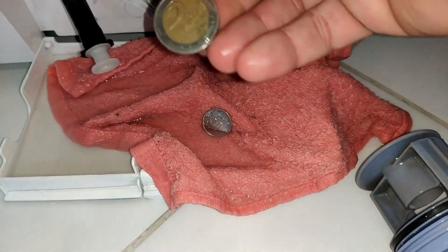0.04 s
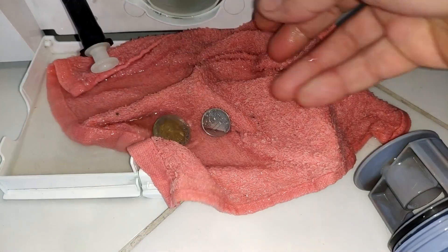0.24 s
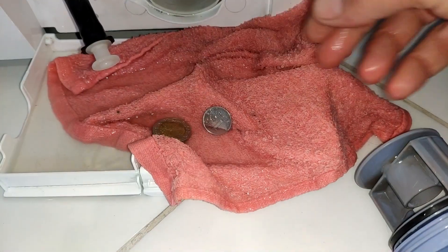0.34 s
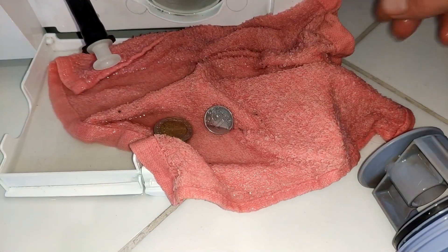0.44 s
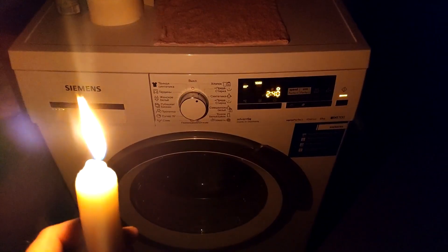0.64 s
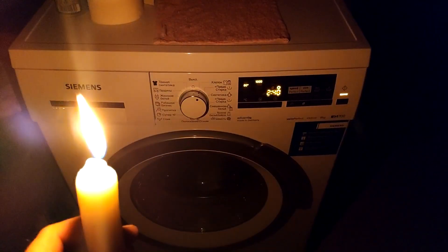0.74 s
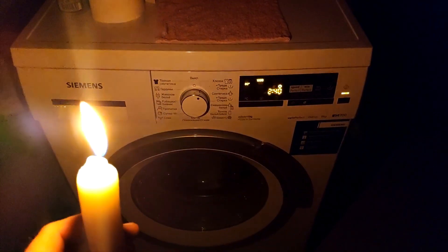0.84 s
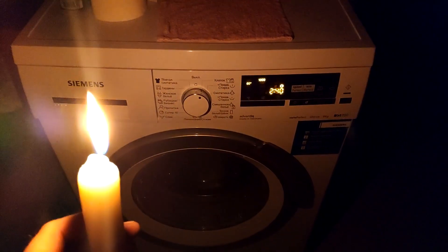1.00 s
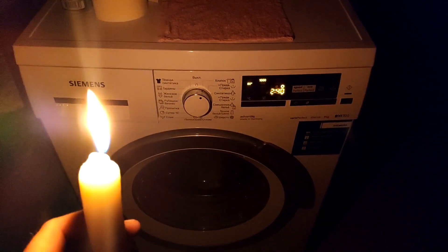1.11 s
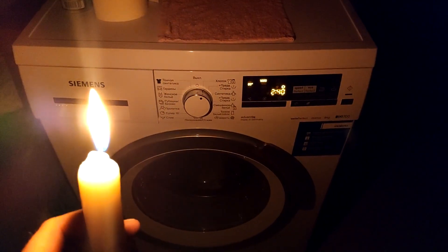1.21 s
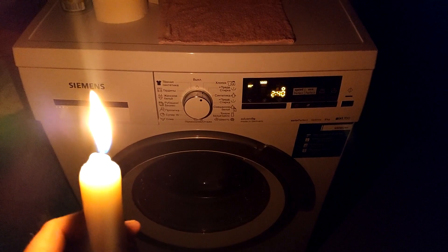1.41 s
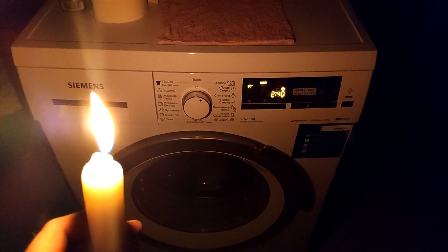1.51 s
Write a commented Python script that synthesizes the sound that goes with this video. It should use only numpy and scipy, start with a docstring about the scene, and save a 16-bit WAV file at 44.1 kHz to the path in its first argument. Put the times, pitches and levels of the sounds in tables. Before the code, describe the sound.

A coin drops onto a cloth on a tiled floor, giving one sharp, hollow knock with no metallic ring. The small room reverberates briefly around the close microphone, then the echo cuts off, leaving a very faint low hum.

```python
"""A coin drops onto a cloth on a tiled floor and gives one hollow knock, with no metal ring.
The impact excites the damped modes of a plastic housing beside it, and a near wall reflects the bass.
The small room reverberates with a diffuse tail and a few standing waves. A tiny tick comes first, as
the coin leaves the fingers. The tail stops abruptly where the faint background hum gives way to a
second, equally quiet one."""
import sys
import numpy as np
from scipy import signal
from scipy.fft import rfft, irfft
from scipy.io import wavfile

SR = 44100
rng = np.random.default_rng(int(sys.argv[2]) if len(sys.argv) > 2 else 0)


def generate_wav(signal):
    """Clip the signal to [-1, 1] and save it as 16-bit WAV at the path in sys.argv[1]."""
    frames = np.transpose(np.atleast_2d(signal))
    scaled = np.clip(frames, -1, 1) * 32767
    pcm = np.round(scaled).astype(np.int16)
    wavfile.write(sys.argv[1], SR, pcm)


N = 68355
KNOCK_S = 0.2375

# Left-right coherence of the coin's sounds, clipped to +-1 in use: frequency_hz, correlation
COHERENCE = [(100, 1.16), (350, 0.7), (700, 1.08), (1300, -0.42), (3000, 0.12), (14000, -1)]
# Stereo balance of the direct sound: frequency_hz, left_minus_right_db
DIRECT_BALANCE = [(150, -6), (600, 1.5), (3000, -9), (5500, 4.5), (7500, -10), (10000, -24.5), (14000, -19)]
# Stereo balance of the reflected sound: frequency_hz, left_minus_right_db
ROOM_BALANCE = [(150, -2.5), (330, -6), (1100, -5), (2000, -2), (5000, -1), (7500, -5), (10000, -25.5),
                (14000, -18.5)]


def amp(db):
    """Amplitude ratio of a level in decibels."""
    return 10 ** (np.asarray(db) / 20)


def unit_rms(x):
    """Normalisation to an rms of 1."""
    return x / np.sqrt(np.mean(x ** 2) + 1e-20)


def curve_at(points, hz):
    """Interpolation on a log-frequency axis."""
    knots_hz, values = np.transpose(points)
    return np.interp(np.log(hz + 1), np.log(knots_hz + 1), values)


def since(start_s):
    """Seconds elapsed since start_s, zero before it."""
    return np.maximum(np.arange(N) / SR - start_s, 0)


def burst(start_s, rise_s, t60_s):
    """Exponential decay, 60 dB in t60_s, with a linear onset."""
    t = since(start_s)
    return np.minimum(t / rise_s, 1) * np.exp(-np.log(1000) * t / t60_s)


def noise(spectrum, coherence, balance):
    """Partial coherence: two channels share part of a coloured noise; the overall rms is 1."""
    hz = np.fft.rfftfreq(N, 1 / SR)
    common, separate = rfft(rng.standard_normal((2, N)))
    correlation = np.clip(curve_at(coherence, hz), -1, 1)
    left = (correlation * common + np.sqrt(1 - correlation ** 2) * separate) * amp(curve_at(balance, hz))
    return unit_rms(irfft(np.array([left, common]) * amp(curve_at(spectrum, hz)), N))


def tone(hz, wander_hz):
    """Slow random frequency modulation makes a sine of rms 1 waver."""
    below_8_hz = np.fft.rfftfreq(N, 1 / SR) < 8
    drift = unit_rms(irfft(rfft(rng.standard_normal(N)) * below_8_hz, N))
    cycles = np.cumsum(hz + wander_hz * drift) / SR + rng.random()
    return np.sqrt(2) * np.sin(2 * np.pi * cycles)


def hollow_knock():
    """Modal ringing: the coin's rim excites the housing's low modes, then its face the high ones."""
    # Modes of the hollow housing: pitch_hz, left_db, right_db, t60_s
    modes = [(145.5, -22.5, -17.5, 0.13), (318.9, -21, -14.5, .11), (430, -21, -21.5, 0.09),
             (643, -23.5, -21.5, 0.12), (800, -18, -17.5, 0.034), (958, -15.5, -21.5, 0.12),
             (1013, -17.5, -27, 0.029), (1241, -24, -10, 0.067), (1704, -14.5, -13, .06),
             (1800, -15.5, -15, 0.065), (2220, -13.5, -20, 0.03043), (2516, -29, -12.5, 0.025),
             (2912, -24, -18.5, .03), (3080, -22.5, -25.5, 0.019), (3446, -29.5, -23, 0.011),
             (3960, -30.5, -25.5, 0.024), (4660, -26.5, -30, .025), (5402, -30.5, -37, 0.037)]
    rim_db, slap_db, slap_above_hz = 0.8, 2, 2000
    slap_s = KNOCK_S + 0.0019
    contact_s = 0.000832  # the cloth softens the onset
    knock = np.zeros((2, N))
    for hz, left_db, right_db, t60_s in modes:
        start_s, blow_db = (slap_s, slap_db) if hz > slap_above_hz else (KNOCK_S, rim_db)
        ring = np.sin(2 * np.pi * hz * since(start_s)) * burst(start_s, contact_s, t60_s)
        knock -= amp(blow_db) * amp([[left_db], [right_db]]) * ring
    return knock


def impact_crack():
    """Modal overlap: dense, quickly damped modes merge into a burst of noise."""
    # Spectrum of the crack: frequency_hz, relative_density_db
    spectrum = [(60, -34.5), (130, -12.5), (400, -2), (900, 1), (1700, 5.5), (2100, -6), (4000, -8.5),
                (5500, -24.5), (6800, -31), (10500, -19.5), (12300, -21.5), (14500, -29.5)]
    envelope = burst(KNOCK_S, rise_s=0.0018, t60_s=0.061)
    return amp(-10) * noise(spectrum, COHERENCE, DIRECT_BALANCE) * envelope


def wall_thump():
    """Early reflection: a near wall returns the bass of the blow, modelled as dull noise."""
    # Spectrum of the reflection: frequency_hz, relative_density_db
    spectrum = [(50, -39.5), (90, -18), (135, -2.5), (330, -3.5), (600, -5.5), (1500, -15), (3000, -34),
                (8000, -59)]
    delay_s = 0.011
    envelope = burst(KNOCK_S + delay_s, rise_s=0.0028, t60_s=0.04)
    return amp(-20.5) * noise(spectrum, COHERENCE, ROOM_BALANCE) * envelope


def room_tail():
    """Diffuse reverberation: each band decays exponentially, the treble fastest."""
    # Initial spectrum of the tail: frequency_hz, relative_density_db
    spectrum = [(50, -37), (90, -16.5), (130, -3), (195, 2.5), (250, -1.5), (320, 4.5), (470, -3.5),
                (680, 1), (1150, 2), (1750, -1), (1950, -7.5), (2300, -4), (3200, -14.5), (4800, -22),
                (6500, -36.5), (10800, -24.5), (14500, -37)]
    # Reverberation time: frequency_hz, t60_s
    decay_times = [(100, .65), (260, 0.72), (700, 0.58), (1800, 0.78), (3000, 0.66), (5000, .55),
                   (8000, 0.42), (13000, 0.19)]
    hz, t, bands = signal.stft(noise(spectrum, COHERENCE, ROOM_BALANCE), SR, nperseg=512)
    decay = np.exp(-np.log(1000) * np.maximum(t - KNOCK_S, 0) / curve_at(decay_times, hz)[:, None])
    tail = signal.istft(bands * decay, SR, nperseg=512)[1][:, :N]
    onset = np.minimum(since(KNOCK_S) / 0.0086, 1)
    return amp(-22) * tail * onset


def standing_waves():
    """Room resonance: a few modes build up after the blow and outlast the housing's ring."""
    # Modes of the room: pitch_hz, level_db
    modes = [(131, -42.5), (194, -32), (297, -38), (333, -32.5), (632, -31.5), (765, -39), (948, -37.5),
             (1137, -31), (1264, -38), (1640, -36.5), (1826, -38.5)]
    t = since(KNOCK_S)
    waves = np.zeros((2, N))
    for hz, db in modes:
        channel_gains = amp([[curve_at(ROOM_BALANCE, hz)], [0]])
        waves -= amp(db) * channel_gains * np.sin(2 * np.pi * hz * t)
    return waves * burst(KNOCK_S, rise_s=0.06, t60_s=0.61)


def release_tick():
    """A contact transient: the coin slips off the fingers with a tiny, bright tick."""
    # Spectrum of the tick: frequency_hz, relative_density_db
    spectrum = [(100, -41), (7000, -22), (9500, -4), (13000, -9), (14500, 0)]
    envelope = burst(start_s=0.176, rise_s=0.0019, t60_s=0.049)
    return amp(-63.5) * noise(spectrum, COHERENCE, DIRECT_BALANCE) * envelope


def first_ambience():
    """Superposition: a low hum and a thin whine waver over steady noise."""
    # Tones of the hum and whine: pitch_hz, level_db
    partials = [(178, -58.5), (3220, -84), (4710, -90.5)]
    # Spectrum of the first noise floor: frequency_hz, relative_density_db
    spectrum = [(25, -24), (85, -19), (130, -8), (178, -0.5), (225, -8), (290, -14.5), (350, -23.5),
                (700, -28.5), (2200, -38), (2900, -31.5), (3220, -30.5), (3600, -39), (4700, -36),
                (6200, -49), (14000, -44)]
    hum = sum(amp(db) * tone(hz, wander_hz=7) for hz, db in partials)
    return hum * amp([[-2], [1]]) + noise_floor(spectrum)


def second_ambience():
    """Superposition: faint hum tones and a late, swelling drone waver over steady noise."""
    # Tones of the hum: pitch_hz, level_db
    partials = [(146, -63), (205, -63), (311, -69), (650, -75)]
    # Envelope of the drone: time_s, level_db
    swell = [(1.189, -87.5), (1.249, -53.5), (1.34, -56), (1.45, -55), (1.55, -73)]
    # Spectrum of the second noise floor: frequency_hz, relative_density_db
    spectrum = [(25, -17), (85, -14), (145, -2.5), (210, 0), (260, -8.5), (320, -5.5), (390, -17.5),
                (750, -26.5), (1000, -28), (1800, -30.5), (3200, -30.5), (6200, -43.5), (14000, -42.5)]
    drone_hz, wander_hz = 151, 2.323
    drone = amp(np.interp(since(0), *np.transpose(swell))) * tone(drone_hz, wander_hz)
    hum = sum(amp(db) * tone(hz, wander_hz) for hz, db in partials)
    return (drone + hum) * amp([[-2.5], [1]]) + noise_floor(spectrum)


def noise_floor(spectrum):
    """Stationary noise, nearly coherent in the upper bass and incoherent in the treble."""
    # Left-right coherence of the background: frequency_hz, correlation
    coherence = [(30, 0.43), (150, .92), (400, .85), (1500, 0.32), (6000, 0.082)]
    # Stereo balance of the background: frequency_hz, left_minus_right_db
    balance = [(50, -2.5), (200, -3), (1000, -2.5), (8000, -2.5)]
    return amp(-57) * noise(spectrum, coherence, balance)


def scene():
    """A quick equal-power crossfade leads from the knock in its room to the second ambience."""
    low_cut = signal.butter(5, 140, "high", fs=SR, output="sos")  # the knock holds no deep bass
    knock = signal.sosfilt(low_cut, hollow_knock() + impact_crack() + wall_thump())
    before = knock + room_tail() + standing_waves() + release_tick() + first_ambience()
    change_s, fade_s = 0.576, 0.0061
    share = np.clip(since(change_s - fade_s / 2) / fade_s, 0, 1)
    return np.sqrt(1 - share) * before + np.sqrt(share) * second_ambience()


def record(dry):
    """Soft saturation rounds the peaks; a low-pass filter then limits the bandwidth."""
    ceiling, cutoff_hz = 0.9, 14400
    rounded = dry / (1 + (dry / ceiling) ** 6) ** (1 / 6)
    low_pass = signal.firwin(511, cutoff_hz, window=("kaiser", 9), fs=SR)
    return signal.oaconvolve(rounded, low_pass[None], "same")


dry = scene()
out = record(dry)
generate_wav(out)
```